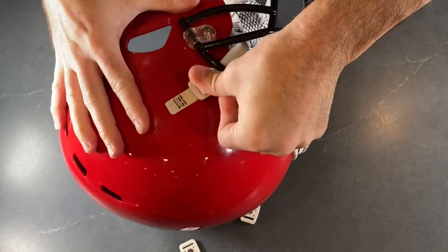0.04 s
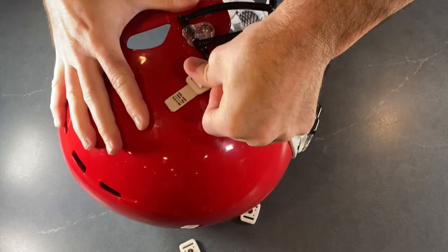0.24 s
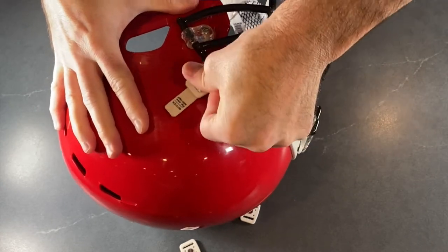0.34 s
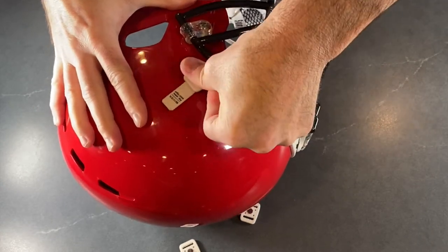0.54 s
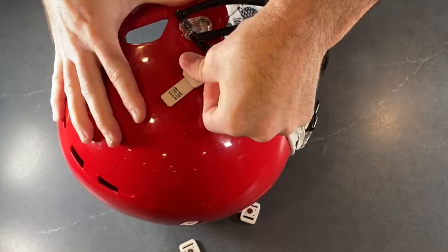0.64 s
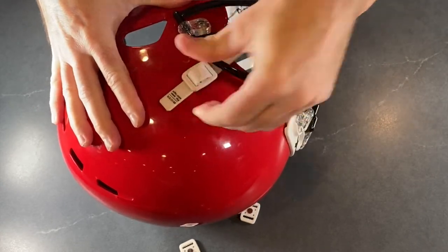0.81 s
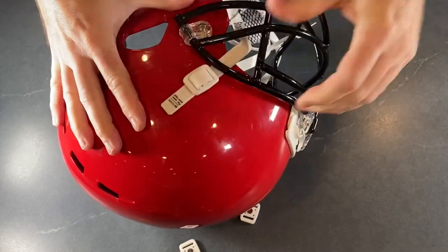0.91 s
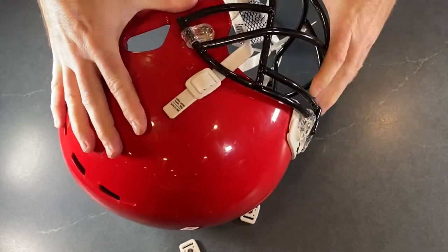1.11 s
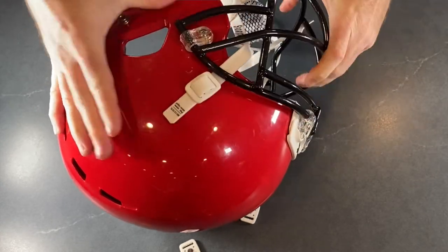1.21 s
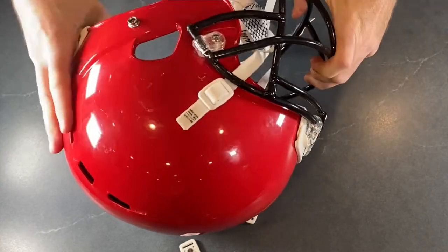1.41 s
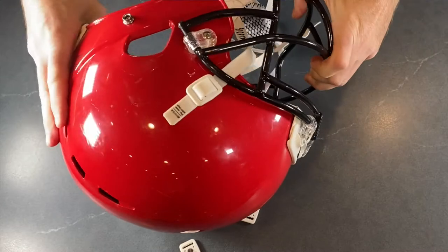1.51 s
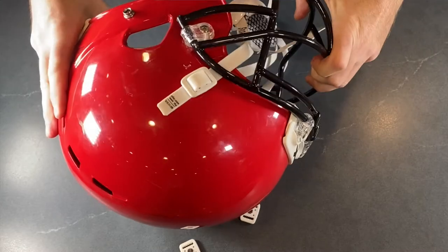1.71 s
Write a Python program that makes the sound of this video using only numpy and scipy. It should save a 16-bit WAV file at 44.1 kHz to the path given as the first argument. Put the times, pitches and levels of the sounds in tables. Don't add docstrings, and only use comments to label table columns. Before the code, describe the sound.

A plastic buckle snaps loudly onto a hard helmet at about 0.22 s, a split-second double click with a short hollow shell ring, after faint fumbling ticks. Soft taps and faint, high skin squeaks continue from 0.4 to 1.1 s. From 1.2 s palms brush and scrape the shell as it rocks with muted knocks, strongest near 1.48 s. Close, mono, small quiet room, low rumble, slight hiss.

```python
import sys
import numpy as np
from scipy import signal
from scipy.fft import rfft, irfft
from scipy.io import wavfile

SR = 44100
rng = np.random.default_rng(int(sys.argv[2]) if len(sys.argv) > 2 else 0)


def gain_from_db(level_db):
    decades = np.asarray(level_db, float) / 20
    return 10 ** decades


def file_out(sig):
    cols = np.atleast_2d(sig).T
    lim = np.clip(cols, -1, 1)
    pcm = np.round(lim * 32767).astype(np.int16)
    wavfile.write(sys.argv[1], SR, pcm)


N = 77175
TIME = np.arange(N) / SR


def rms_one(x):
    return x / np.sqrt(np.mean(x ** 2) + 1e-20)


def in_time(rows):
    s, *columns = np.transpose(rows)
    return [np.interp(TIME, s, column) for column in columns]


def at_hz(points, hz):
    table_hz, values = np.transpose(points)
    return np.interp(np.log(hz), np.log(table_hz), values)


def shaped(x, points):
    hz = np.arange(len(x) // 2 + 1) * SR / len(x) + 1
    below = (points[0][0] / 2, points[0][1] - 20)
    above = (points[-1][0] * 2, points[-1][1] - 20)
    gain = gain_from_db(at_hz([below] + list(points) + [above], hz))
    return rms_one(irfft(rfft(x) * gain, len(x)))


def coloured(points, size=N):
    return shaped(rng.standard_normal(size), points)


def lowpassed_pair(hz):
    sos = signal.butter(2, hz, fs=SR, output="sos")
    return signal.sosfilt(sos, rng.standard_normal((2, N + SR)))[:, SR:]


GRIP_DETUNE = .03


def ringing(modes, extra_db, detune, t):
    hz, db, t60 = np.transpose(modes)[:, :, None]
    signs = (-1.) ** np.arange(len(modes))[:, None]
    spread, bend = rng.standard_normal((2, len(modes), 1))
    db = db + extra_db + 2 * spread * detune / GRIP_DETUNE
    hz = hz * (1 + detune * bend)
    fade = gain_from_db(db - 60 * t / t60 * (1 + 10 * detune))
    out = np.sum(signs * fade * np.sin(2 * np.pi * hz * t), axis=0)
    return out / np.abs(out).max()


# f/Hz, level/dB, t60/s
BUCKLE_MODES = [(2500, -11, .02), (4120, -8.5, 0.0197), (4570, 0, 0.018), (5130, -0.2, .022),
                (5473, -2.4, 0.019), (7300, -9.5, 0.025), (7700, -10.5, .015), (8680, -5.5, 0.018),
                (10100, -8.5, 0.0149), (10500, -8, 0.019), (12240, -2, 0.0121)]


def contacts(rows, body, crack_colour, detune, buckle_db):
    out = np.zeros(N + SR)
    t = np.arange(SR // 4) / SR
    for s, db, hz, crack_db, length in rows:
        when, size = rng.random((2, 5))
        ticks = np.zeros(SR // 40)
        ticks[0] = 1
        later = np.minimum(when * length * SR, len(ticks) - 1).astype(int)
        np.add.at(ticks, later, .45 * size)

        buckle = signal.fftconvolve(ringing(BUCKLE_MODES, 0, detune, t), ticks)[:len(t)]
        buckle = buckle * gain_from_db(crack_db + buckle_db)

        soft_s = .0005 * min(length * 300, 1)
        ticks = np.convolve(ticks, np.hanning(int(soft_s * SR) + 3))
        away = np.log2(np.array(body)[:, :1] / hz) / .6
        off_pitch_db = np.maximum(-6 * away ** 2, -13)
        hit = signal.fftconvolve(ringing(body, off_pitch_db, detune, t), ticks)[:len(t)]
        hit = hit / np.abs(hit).max()

        rise = np.clip(t / min(.00041, length), 0, 1)
        crack_t60_s = .019 + 3 * length
        crack = coloured(crack_colour, size=len(t)) * gain_from_db(crack_db - 9 - 60 * t / crack_t60_s) * rise

        start = int(s * SR)
        out[start:start + len(t)] += gain_from_db(db) * (hit + crack + buckle)
    return out[:N]


# t/s, peak level/dB, struck f/Hz, crack level/dB, length/s
SNAP = [
    (.2217, -19, 1000, 0.5, 0.0001),
    (.2240, -25.5, 990, -17, 0.000093),
    (.2250, -15, 1760, -20.5, 0.00011),
    (.2267, -14, 1870, -14, 0.00031),
]
# f/Hz, level/dB, t60/s
SHELL_MODES = [(163.5, -7.5, .25), (302, -18.5, 0.055), (438.5, 1, .1), (630, -3, 0.082), (733, -8, .06),
               (821.5, -8.5, 0.035), (986, -1.5, 0.057), (1220, -7.5, 0.035), (1360, -3.5, 0.053),
               (1653, 0, 0.033), (1936, 0, .032), (2240, -10, 0.044), (2500, -7, 0.0363), (2980, -17, .02)]
# f/Hz, level/dB per Hz
BUCKLE_CRACK = [(1000, -12), (2500, -3.5), (3400, -9), (5200, 3), (6500, -8.5), (8400, 0), (9400, -7),
                (12200, -1.5)]


def snap():
    thumb_s, thumb_db = .2283, -7
    thumb = gain_from_db(thumb_db * np.clip((TIME - thumb_s) * 1000, 0, 1))
    return thumb * contacts(SNAP, SHELL_MODES, BUCKLE_CRACK, detune=.005, buckle_db=-2.5)


# t/s, peak level/dB, struck f/Hz, crack level/dB, length/s
FUMBLES = [(.0003, -41.5, 1960, -2.5, 0.0019), (.004, -46, 1490, -8.5, 0.0028),
           (.0155, -43.5, 1310, -25, 0.0011), (.021, -46, 1270, -33, 0.0012), (.028, -50, 990, -30, 0.0023),
           (.032, -57, 1300, -34, 0.0056), (.051, -51, 1600, -27, 0.0056), (.065, -52.5, 1490, -32, .006),
           (.095, -62, 1900, -2, 0.0028), (.148, -59.5, 1750, -36, 0.0037),
           (.1800, -46.5, 691, -2.5, 0.0079), (.181, -33.5, 2124, -16, 0.0052),
           (.509, -60.5, 1550, -34, 0.00345), (.532, -59, 1815, 5, 0.0025), (.555, -52.5, 950, -22, 0.0033),
           (.570, -46, 1700, -17, .004), (.579, -49, 1680, -6, .002), (.676, -61, 410, -11, 0.0084),
           (.680, -57.5, 1740, -15, 0.0041), (.748, -55, 793, -8, 0.0044), (.790, -54.5, 427, -22, 0.0079),
           (.792, -54.5, 1470, -27, 0.0055), (.823, -44, 1290, -20.5, 0.0023),
           (.938, -56.5, 2500, -10, 0.0022)]


def fumbles():
    return contacts(FUMBLES, SHELL_MODES, BUCKLE_CRACK, GRIP_DETUNE, buckle_db=-8.5)


# t/s, peak level/dB, struck f/Hz, crack level/dB, length/s
ROCKS = [(1.197, -39, 425, -15, 0.001), (1.1968, -42.5, 1395, -2.5, 0.003), (1.205, -43, 1110, -17, 0.0071),
         (1.256, -54, 1600, -20.5, 0.0092), (1.267, -45, 2200, -3, 0.0042),
         (1.27, -48.5, 1900, -13, 0.0033), (1.32, -49, 420, -8, 0.014), (1.347, -57.5, 1770, 9, 0.0042),
         (1.437, -50, 1340, -10, 0.0066), (1.452, -53, 2240, -26, 0.006), (1.484, -34.5, 965, -11, 0.00057),
         (1.4845, -45, 2000, 4, 0.0009), (1.515, -53, 1300, -3, .008), (1.54, -56.5, 1250, -24, 0.0038),
         (1.598, -56, 2300, -25, 0.0033), (1.612, -50, 434, 1, 0.0076), (1.612, -51.5, 2410, -7, 0.0045),
         (1.625, -54, 2880, -12, 0.0056)]
# f/Hz, level/dB, t60/s
HELD_SHELL_MODES = [(296, -10, .1), (425, -0.9, 0.065), (684, -7, 0.072), (899, 2.8, 0.036),
                    (1186, -0.5, 0.064), (1424, -4, 0.031), (1700, -5, 0.046), (1880, -1, 0.031),
                    (2263, -3.5, 0.04), (2720, -6, 0.017), (3000, -6.5, 0.028), (4360, -7, .015)]
# f/Hz, level/dB per Hz
TABLE_CRACK = [(500, 5), (1500, 7), (3000, 2), (4500, -4.5), (6000, -11), (9000, -6), (14000, -43)]


def rocks():
    return contacts(ROCKS, HELD_SHELL_MODES, TABLE_CRACK, GRIP_DETUNE / 2, buckle_db=-30)


# t/s, level/dB
SCRAPE = [(0, -53), (.04, -73), (.08, -85), (.11, -100), (1.18, -100), (1.21, -69), (1.245, -80),
          (1.28, -71.5), (1.37, -72), (1.41, -96), (1.44, -86), (1.5, -56.5), (1.55, -70.5), (1.62, -73.5),
          (1.7, -91)]
# f/Hz, level/dB per Hz
SCRAPE_COLOUR = [(300, 6), (430, 4), (700, -6), (1300, 0), (2200, -7), (3500, -18.5)]


def scrape():
    grains_per_s, spread_db = 530, 5.5
    happens = rng.random(N) < grains_per_s / SR
    size = gain_from_db(spread_db * np.minimum(rng.exponential(1, N), 2))
    grains = happens * size * rng.choice([-1, 1], N)
    return gain_from_db(in_time(SCRAPE)[0]) * shaped(grains, SCRAPE_COLOUR)


# t/s, f/Hz, level/dB
FIRST_SLIDE = [(.36, 9200, -100), (.385, 10610, -74), (.41, 11530, -68), (.46, 10100, -76.5),
               (.5, 8600, -91), (.525, 7880, -87), (.55, 7570, -110)]
# t/s, f/Hz, level/dB
SECOND_SLIDE = [(.66, 8040, -110), (.69, 8310, -87), (.74, 7180, -90), (.77, 8440, -86), (.84, 11000, -76),
                (.9, 8100, -93), (.98, 10320, -81.5), (1.03, 12000, -77), (1.075, 14750, -78),
                (1.13, 10700, -78), (1.18, 12900, -77.5), (1.22, 12460, -78), (1.28, 13200, -80),
                (1.4, 13400, -81), (1.75, 13100, -100)]


def squeak(rows):
    hz, db = in_time(rows)
    core = rms_one(lowpassed_pair(260))
    halo = rms_one(lowpassed_pair(1100))
    slow = core + gain_from_db(-3) * halo
    phase = 2 * np.pi * np.cumsum(hz) / SR
    return gain_from_db(db) * rms_one(slow[0] * np.cos(phase) + slow[1] * np.sin(phase))


# t/s, level/dB
BRUSH = [(0, -100), (.65, -124), (.8, -81), (.95, -84), (1.03, -81), (1.08, -73.5), (1.12, -83),
         (1.18, -78.5), (1.25, -76.5), (1.38, -76.5), (1.45, -71.5), (1.55, -72), (1.75, -77.5)]
# f/Hz, level/dB per Hz
BRUSH_COLOUR = [(1760, -22.5), (3000, -6.5), (3370, -13), (3910, -10), (4970, -13.5), (6480, 1.5),
                (13500, -3.5), (15300, -14.5)]


def brush():
    return gain_from_db(in_time(BRUSH)[0]) * coloured(BRUSH_COLOUR)


# f/Hz, t60/s
ROOM_T60 = [(160, 0.37), (500, 0.39), (1500, 0.28), (4000, 0.3), (10000, 0.25)]
# f/Hz, level/dB
ROOM_LEVEL = [(160, -17), (500, -9.5), (1500, -20.5), (4000, -16), (10000, -16.5)]


def room(x):
    edges = 100 * 2 ** np.arange(0, 7.6, .5)
    build_s = .0074
    build = np.exp(-1 / (build_s * SR))
    out = 0
    for low, high in zip(edges, edges[1:]):
        hz = np.sqrt(low * high)
        keep = gain_from_db(-120 / (at_hz(ROOM_T60, hz) * SR))
        sos = signal.butter(2, [low, high], "band", fs=SR, output="sos")
        band, noise = signal.sosfilt(sos, [x + 1e-18, rng.standard_normal(N)])
        arriving = signal.lfilter([1 - build], [1, -build], band ** 2)
        energy = signal.lfilter([1 - keep], [1, -keep], arriving)
        out = out + gain_from_db(at_hz(ROOM_LEVEL, hz)) * np.sqrt(energy) * rms_one(noise)
    return out


# t/s, level/dB
RUMBLE = [(0.0, -53.5), (0.092, -51.5), (1.574, -51.5), (1.602, -50), (1.75, -52.5)]


def rumble():
    pitch_hz, wander_hz, wander_rate_hz, swell_db = 31, 7, 8, 2.5
    slow = lowpassed_pair(wander_rate_hz)
    hz = pitch_hz + wander_hz * rms_one(slow[0])
    level = gain_from_db(in_time(RUMBLE)[0] + swell_db * rms_one(slow[1]))
    return level * np.sqrt(2) * np.sin(2 * np.pi * np.cumsum(hz) / SR)


# f/Hz, level/dB per Hz
ROOM_TONE = [(35, -42), (60, -3), (163, -20), (459, -29.5), (553, -34), (1100, -35.5), (2060, -35),
             (5000, -53), (6500, -89), (11000, -120)]


def room_tone():
    return gain_from_db(-64) * coloured(ROOM_TONE)


# f/Hz, level/dB per Hz
HISS = [(100, 2.5), (3000, 1), (6000, 4), (10000, 0), (13500, -1), (14500, -8)]


def hiss():
    return gain_from_db(-84.5) * coloured(HISS)


def scene():
    hits = snap() + fumbles() + rocks()
    hits = signal.sosfilt(signal.butter(2, 150, "high", fs=SR, output="sos"), hits)
    hands = squeak(FIRST_SLIDE) + squeak(SECOND_SLIDE) + brush() + scrape()
    background = rumble() + room_tone() + hiss()
    return (hits + room(hits) + hands + background)[None]


def band_limit(x):
    return signal.sosfilt(signal.butter(12, 15420, fs=SR, output="sos"), x)


def record(dry):
    mix = signal.sosfilt(signal.cheby2(12, 60, 15650, fs=SR, output="sos"), dry)
    return band_limit(mix)


dry = scene()
out = record(dry)
file_out(out)
```